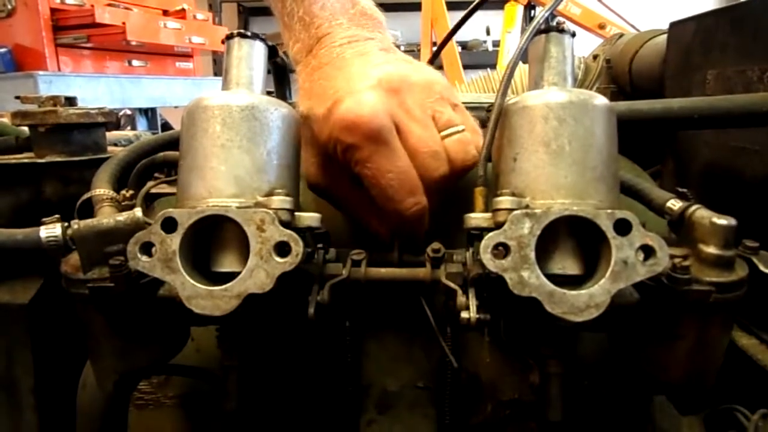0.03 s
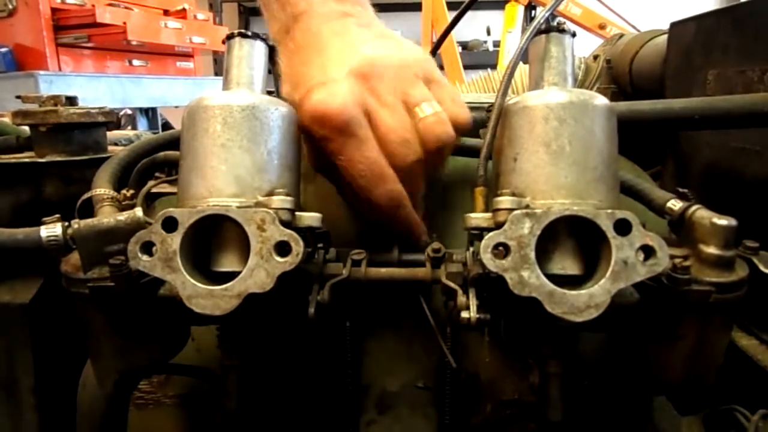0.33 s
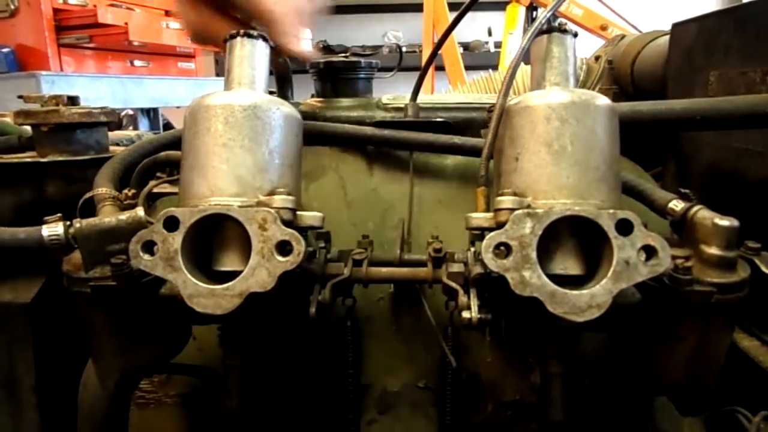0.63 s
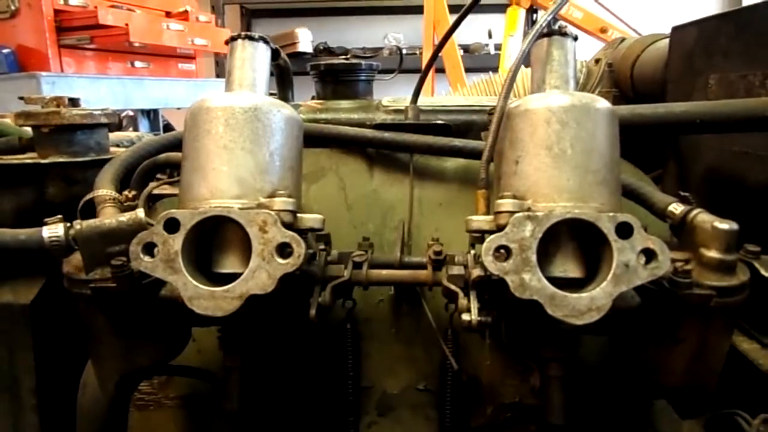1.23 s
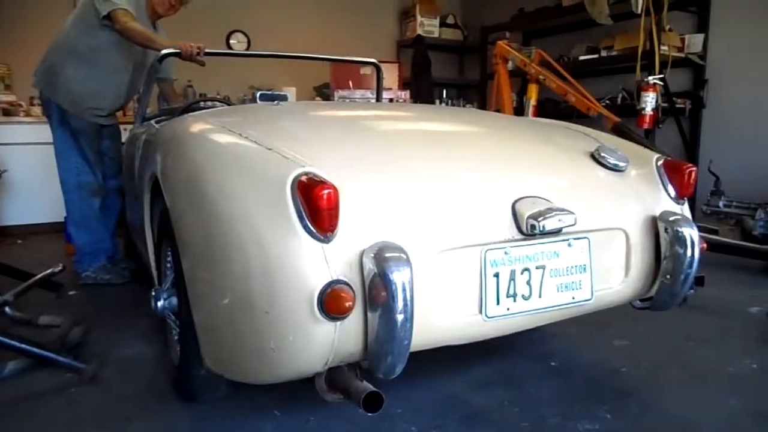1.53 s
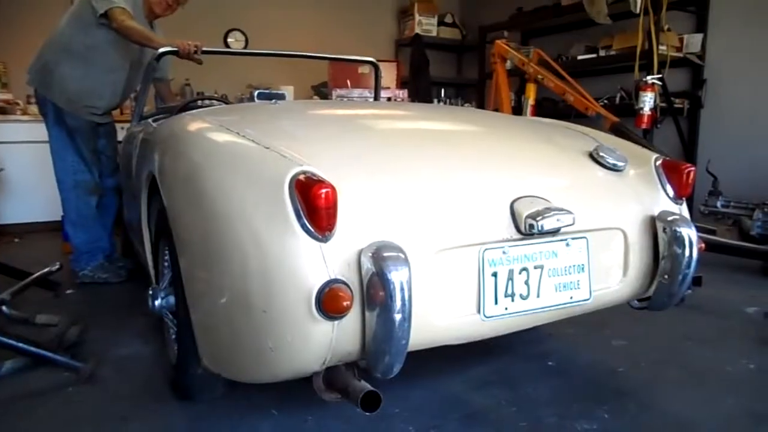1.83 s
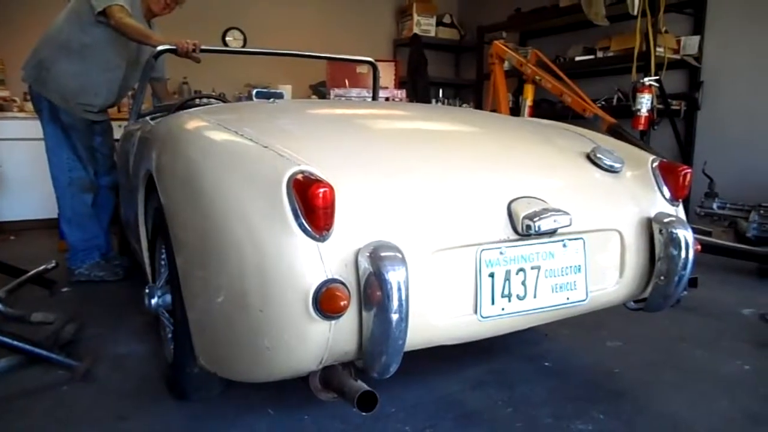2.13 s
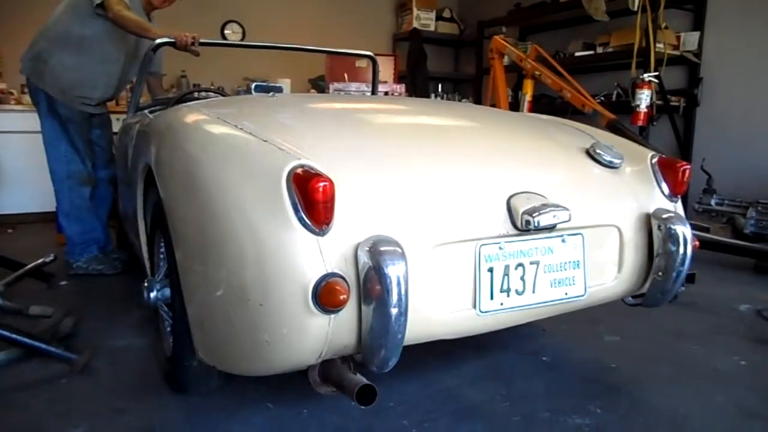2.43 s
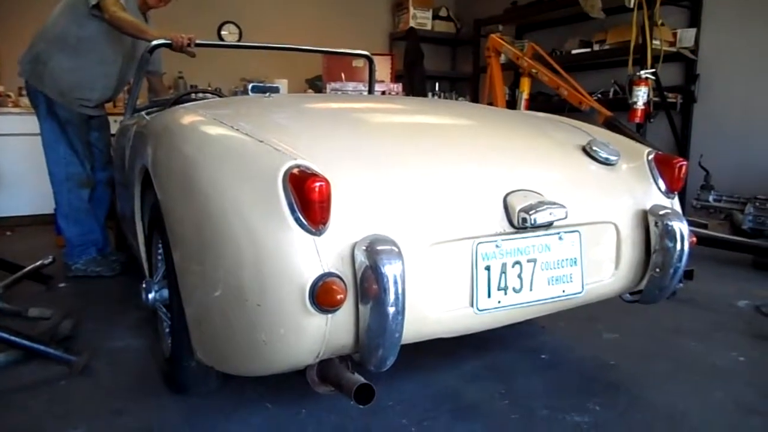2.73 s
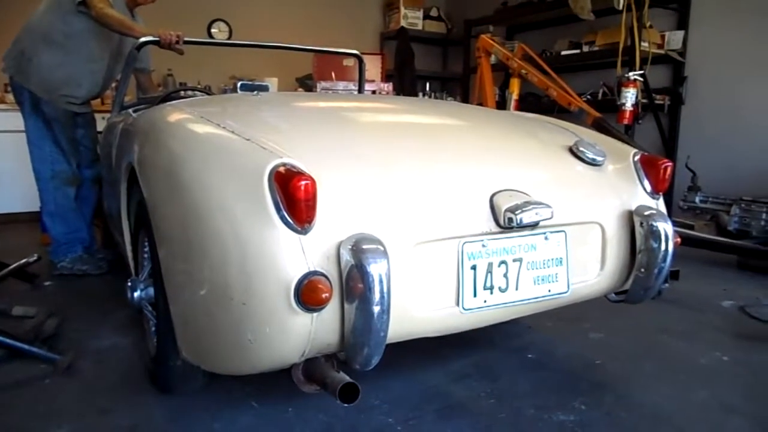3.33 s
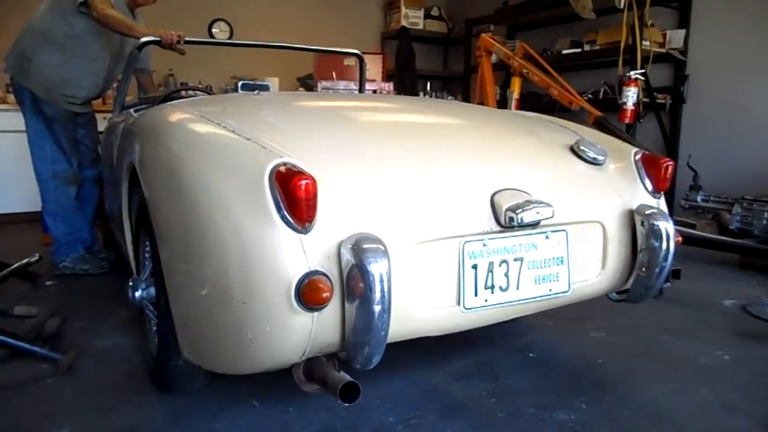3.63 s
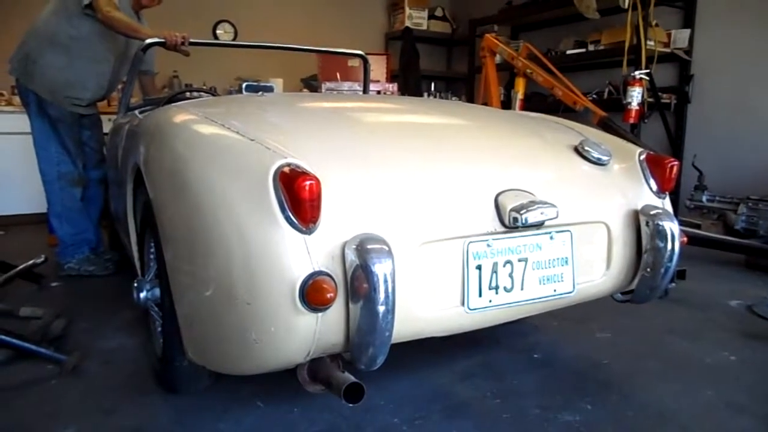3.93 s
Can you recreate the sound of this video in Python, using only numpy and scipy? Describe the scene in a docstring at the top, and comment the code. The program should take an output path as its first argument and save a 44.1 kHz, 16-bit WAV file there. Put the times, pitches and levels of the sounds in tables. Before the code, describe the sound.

An old four-cylinder car engine slows to a lumpy idle, its valves clattering close by. After a brief silence, heard from behind the tailpipe, it idles unevenly, spits, revs once with a rasp and runs down in a garage.

```python
"""In a garage, an old four-cylinder sports car is heard from two spots, with a short silence between.
Over the open carburettors the engine falls from a blip of throttle to a lumpy idle, valves clattering.
Behind the tailpipe it idles with the odd misfire, is revved once with a rasp and spits, and runs down.
Each firing pushes a pulse of gas down the pipe: the pulses boom and thump, and make the pipe ring."""
import sys
import numpy as np
from scipy import signal
from scipy.fft import rfft, irfft
from scipy.io import wavfile
from scipy.ndimage import uniform_filter1d

SR = 44100
rng = np.random.default_rng(int(sys.argv[2]) if len(sys.argv) > 2 else 0)


def store_wav(level_fs):
    """Save 16-bit WAV to argv[1]."""
    pcm = np.round(np.clip(np.atleast_2d(level_fs), -1, 1) * 32767)
    wavfile.write(sys.argv[1], SR, pcm.T.astype(np.int16))


N = 176400
T = np.arange(N) / SR


def from_db(db):
    """Turn decibels into a gain."""
    return 10 ** (np.asarray(db) / 20)


def curve(rows):
    """Join rows of (seconds, value) with straight lines."""
    return np.interp(T, *np.transpose(rows))


def even(x):
    """Hold the average level at 1, leaving single pulses alone."""
    power = uniform_filter1d(uniform_filter1d(x * x, size=4400), size=3000)
    return x / np.sqrt(np.maximum(power, 0) + 1e-18)


def colour(x, points):
    """Make some pitches louder and others softer, fading out above the last point."""
    size = 2 ** 18
    grid_hz = np.maximum(np.arange(size // 2 + 1) * SR / size, 1)
    hz, db = np.transpose(points)
    fade_db = -15 * np.log2(np.maximum(grid_hz / hz[-1], 1))
    gain = from_db(np.interp(np.log(grid_hz), np.log(hz), db) + fade_db)
    # Make the filter ring only after a pulse, never before it.
    cepstrum = irfft(np.log(gain))
    cepstrum[1:size // 2] *= 2
    cepstrum[size // 2 + 1:] = 0
    return irfft(rfft(x, size) * np.exp(rfft(cepstrum)))[:N]


def garage(x, echo_db, fade_s=0.46):
    """The walls add a short, blurred echo."""
    echo = rng.standard_normal(SR // 2) * from_db(-60 * T[:SR // 2] / fade_s)
    return x + from_db(echo_db) * signal.fftconvolve(x, echo / np.linalg.norm(echo))[:N]


def count_firings(speed, firing_s):
    """A rising count: a cylinder fires at each whole number, one of them at firing_s."""
    count = np.cumsum(curve(speed)) / SR
    count -= np.interp(firing_s, T, count)
    return count - np.floor(count[0])


def with_speed(count, mean_db, db_per_octave):
    """A gain that grows as the engine runs faster."""
    octaves = np.log2(np.gradient(count))
    return from_db(mean_db + db_per_octave * (octaves - octaves.mean()))


# The four cylinders in firing order. Each number: relative strength in dB.
CYLINDER_DB = [1, -0.26, 1, -0.66]
def strengths(count, uneven_db):
    """How strong the nearest firing is: its cylinder's strength plus some chance."""
    nearest = np.round(count).astype(int)
    chance_db = uneven_db * rng.standard_normal(N)[nearest]
    return from_db(np.array(CYLINDER_DB)[nearest % 4] + chance_db)


def pulses(count, uneven_db):
    """One click for each firing."""
    return np.diff(np.floor(count), prepend=0) * strengths(count, uneven_db)


def puffs(count, decay_s, steady, uneven_db):
    """Noise that flares at each whole count and dies down to a steady rush."""
    age_s = count % 1 / np.gradient(count) / SR
    noise = rng.standard_normal(N)
    return noise * (steady + np.exp(-age_s / decay_s) * strengths(count - .5, uneven_db))


def bursts(events, decay_s, tone):
    """Short cracks of noise that start at once and die away."""
    level = sum(from_db(db) * (T >= s) * np.exp(-np.abs(T - s) / decay_s) for s, db in events)
    return level * even(colour(rng.standard_normal(N), tone))


# Tone of the hiss over the engine. Each row: pitch in Hz, relative level in dB.
BAY_HISS_TONE = [(3000, -12.5), (5200, 5), (7300, 1.5), (9700, 3.5), (10600, 7.5), (15000, -2), (15700, 7),
                 (16300, -25.5)]
def bay_hiss(count):
    """A high hiss that flutters twice per firing."""
    noise = puffs(2 * count, decay_s=.0035, steady=1, uneven_db=5.5)
    return from_db(-48) * even(colour(noise, BAY_HISS_TONE))


# Gas hissing out of the pipe. Each row: time in seconds, level in dB.
TAIL_HISS = [(1.7, -60.5), (2.1, -59), (2.27, -52), (2.47, -52.5), (2.6, -48), (2.71, -49), (2.78, -55),
             (3.5, -58.5), (3.78, -65), (4, -59)]
# Its tone. Each row: pitch in Hz, relative level in dB.
TAIL_HISS_TONE = [(3000, -15), (5200, 0), (11000, -1.5), (15600, -9)]
def tail_hiss(count):
    """Gas hisses at the pipe's mouth, flaring with each firing."""
    gas = puffs(count, decay_s=.0015, steady=1.1, uneven_db=3)
    return from_db(curve(TAIL_HISS)) * even(colour(gas, TAIL_HISS_TONE))


# Tone of the valve clatter. Each row: pitch in Hz, relative level in dB.
CLATTER_TONE = [(600, -2), (1400, 0), (1750, -2), (3800, -4), (4300, -11), (6000, -18), (10000, -34)]
# Ringing metal parts. Each row: pitch in Hz, relative level in dB.
METAL_RINGS = [(2105, 2), (2294, -3.5), (2493, 2.5), (3205, 3.5), (3409, 2)]
def valve_clatter(count, decay_s, steady, uneven_db, ring_width_hz=14):
    """The valves rattle twice per firing and set the engine's metal ringing."""
    rattle = colour(puffs(2 * count, decay_s, steady, uneven_db), CLATTER_TONE)
    r = np.exp(-np.pi * ring_width_hz / SR)  # share of a ring left after one sample
    feed = (1 - r * r) / 2
    rings = np.zeros(N)
    for hz, db in METAL_RINGS:
        feedback = [1, -2 * r * np.cos(2 * np.pi * hz / SR), r * r]
        rings += from_db(db - .5) * signal.lfilter([feed, 0, -feed], feedback, rattle)
    return even(rattle + rings)


# Loud valve ticks. Each row: start in seconds, relative level in dB.
TICKS = [(.827, -33.5), (.8615, -25), (.9543, -30), (1.0121, -24), (1.053, -29), (1.0939, -25.5),
         (1.1807, -25.5), (1.275, -24), (1.3, -23.5)]
def valve_ticks():
    """Single ticks of the valve gear stand out as the engine slows."""
    ticks = bursts(TICKS, decay_s=.005, tone=[(1800, -20), (3000, 0), (3800, 0), (4800, -20)])
    return garage(from_db(-7.5) * ticks, echo_db=-2)


# Spits of gas. Each row: start in seconds, relative level in dB.
SPITS = [(2.2556, -27.5), (2.2851, -32), (2.3135, -31), (2.3379, -35), (2.3614, -30.5), (2.3828, -34),
         (2.4028, -48), (2.4397, -33), (2.4716, -28.5)]
def spits():
    """The tailpipe spits sharply as the rev begins."""
    tone = [(2000, -2.5), (5500, -6), (7600, 2.5), (9500, -5), (16000, -15)]
    return garage(from_db(-7) * bursts(SPITS, decay_s=.0034, tone=tone), echo_db=-2)


# Crackle of the rev. Each row: time in seconds, level in dB.
CRACKLE = [(2.42, -70), (2.5, -48), (2.6, -46), (2.72, -49.5), (2.76, -80)]
# Its tone. Each row: pitch in Hz, relative level in dB.
CRACKLE_TONE = [(2000, -7), (14000, 1)]
def crackle(count):
    """At full throttle every firing leaves the pipe with a bright snap."""
    snaps = puffs(count, decay_s=.0009, steady=0, uneven_db=2)
    return from_db(curve(CRACKLE)) * even(colour(snaps, CRACKLE_TONE))


def rasp(count, tone, rough, decay_s, echo_db, uneven_db=8):
    """The sharp edge of each pulse and its puff of gas ring in the pipe."""
    edges = even(pulses(count, uneven_db))
    gas = even(puffs(count, decay_s, steady=.65, uneven_db=5.5))
    return even(garage(colour(edges + rough * gas, tone), echo_db))


# Tone of the rasp over the engine. Each row: pitch in Hz, relative level in dB.
BAY_RASP_TONE = [(100, -22), (250, -1.5), (380, -5.5), (560, -4.5), (750, -9.5), (1100, -13), (1500, -22.5),
                 (3000, -40)]
def bay_rasp(count):
    """A breathy rasp that softens as the engine slows."""
    level = with_speed(count, mean_db=-35.5, db_per_octave=5.5)
    return level * rasp(count, BAY_RASP_TONE, rough=4, decay_s=.0053, echo_db=-1)


# Rasp behind the car. Each row: time in seconds, level in dB.
TAIL_RASP = [(1.7, -41), (2.1, -39.5), (2.5, -31.5), (2.73, -31.5), (2.85, -28), (3.15, -31), (3.6, -35),
             (4, -37.5)]
# Its tone. Each row: pitch in Hz, relative level in dB.
TAIL_RASP_TONE = [(130, -5), (245, 9), (290, -3), (335, -3.5), (400, -11), (670, -8.5), (1300, -20),
                  (4000, -52)]
def tail_rasp(count):
    """The pipe rasps most as the throttle shuts."""
    return from_db(curve(TAIL_RASP)) * rasp(count, TAIL_RASP_TONE, rough=1.24, decay_s=.012, echo_db=8.5)


# Bark of the open throttle. Each row: time in seconds, level in dB.
BARK = [(2.25, -47), (2.47, -44.5), (2.56, -29.5), (2.7, -28.5), (2.77, -35), (2.9, -61)]
# Its tone. Each row: pitch in Hz, relative level in dB.
BARK_TONE = [(250, -50), (520, -1.5), (780, 7), (980, 1), (1220, -10), (1500, -8.5), (2100, -18),
             (5000, -25.5)]
def throttle_bark(count):
    """The open throttle adds a higher, harder rasp."""
    bark = rasp(count, BARK_TONE, rough=.9, decay_s=.0022, echo_db=-7, uneven_db=3)
    return from_db(curve(BARK)) * bark


def drone(count, levels, tone):
    """Nearly even pulses make the pipe sing with clear overtones."""
    ringing = colour(pulses(count, uneven_db=2.5), tone)
    return from_db(curve(levels)) * even(garage(ringing, echo_db=-9))


# Firings that fail. Each row: time in seconds, drop of the thumps in dB.
MISFIRES = [(1.983, 19), (2.155, 11), (3.21, 8), (3.329, 20)]
def burn(dip_s=.014):
    """How well the fuel burns, dipping at each misfire."""
    return from_db(-sum(db * np.exp(-((T - s) / dip_s) ** 2) for s, db in MISFIRES))


def thumps(count, levels, tone, uneven_db, rough, echo_db, idle_hz=29, stumble=.04):
    """Pressure pulses and swirling gas thump through the pipe; slow firings come unevenly."""
    stray = uniform_filter1d(rng.standard_normal(N)[np.round(count).astype(int)], size=200)
    slowness = np.clip(2 - np.gradient(count) * SR / idle_hz, 0, 1)
    count = np.maximum.accumulate(count + stray * stumble * slowness)
    # Take out the steady flow and the lowest note, which boom() plays.
    lowest = np.gradient(count) * (1 + 2 * np.cos(2 * np.pi * count))
    gas = even(pulses(count, uneven_db) - lowest) + rough * rng.standard_normal(N)
    return garage(even(colour(gas, tone)) * from_db(curve(levels)) * burn(), echo_db)


def boom(count, levels, lag_s, uneven_db):
    """The exhaust's deep, clean note: one wave for each firing."""
    wave = np.sqrt(2) * np.cos(2 * np.pi * (count - lag_s * SR * np.gradient(count)))
    strength = uniform_filter1d(strengths(count, uneven_db), size=600)
    return wave * from_db(curve(levels)) * strength * np.sqrt(burn())


# The engine slowing after the blip. Each row: time in seconds, firings per second.
BAY_SPEED = [(0, 98.4), (.25, 90.1), (.42, 76.7), (.6, 69.9), (.76, 60.5), (.87, 56.5), (1.1, 46),
             (1.31, 35.5)]
# Exhaust boom, thumps and drone over the engine. Each row: time in seconds, base level in dB.
BAY_BOOM = [(0, -18), (.31, -17.5), (0.399, -19.5), (.45, -15), (.58, -14.5), (.65, -25), (.74, -19),
            (.8, -32), (1.2, -26), (1.31, -34)]
BAY_THUMP = [(0, -23.5), (.32, -23.5), (.5, -26.5), (.58, -22), (.68, -27.5), (.8, -26), (0.869, -18),
             (1.222, -25), (1.29, -20)]
BAY_DRONE = [(0, -24.5), (.13, -22), (.21, -25.5), (.28, -48)]
# Tone of those thumps and that drone. Each row: pitch in Hz, relative level in dB.
BAY_THUMP_TONE = [(20, -17.5), (50, -4), (80, -4), (118, 1.5), (150, -17.5), (195, -4), (260, -24.5),
                  (400, -24), (1400, -64.5)]
BAY_DRONE_TONE = [(110, -30), (185, 0), (285, -14), (380, -8), (480, -26)]
def engine_bay():
    """Close over the engine: the exhaust throbs under valve clatter and hiss."""
    count = count_firings(BAY_SPEED, firing_s=.0036)
    exhaust = boom(count, BAY_BOOM, lag_s=.0032, uneven_db=1.5)
    exhaust += thumps(count, BAY_THUMP, BAY_THUMP_TONE, uneven_db=4, rough=.47, echo_db=-5.5)
    exhaust += bay_rasp(count)
    clatter = valve_clatter(count, decay_s=.023, steady=.99, uneven_db=3)
    clatter *= with_speed(count, mean_db=-39, db_per_octave=4.5)
    return exhaust + clatter + bay_hiss(count) + valve_ticks() + drone(count, BAY_DRONE, BAY_DRONE_TONE)


# The engine idling, revving and running down. Each row: time in seconds, firings per second.
TAIL_SPEED = [(1.7, 28.77), (2.19, 28.78), (2.28, 33.47), (2.42, 53.82), (2.6, 90.34), (2.72, 114.36),
              (2.78, 108.8), (3, 95.8), (3.24, 80.3), (3.48, 69.1), (3.72, 59.2), (4, 52)]
# Exhaust boom, thumps and drone behind the car. Each row: time in seconds, base level in dB.
TAIL_BOOM = [(1.7, -19.5), (2.3, -18), (2.39, -29), (2.47, -23), (2.56, -14), (2.64, -10.5), (2.72, -23),
             (2.9, -14.5), (3.04, -10.3), (3.18, -11.5), (3.23, -16), (3.48, -12.5), (3.65, -19),
             (3.73, -28), (4, -30)]
TAIL_THUMP = [(1.7, -18.8), (2.15, -17), (2.35, -11), (2.42, -16.5), (2.49, -10.5), (2.54, -22),
              (2.66, -26), (2.94, -41), (3.3, -26.5), (3.65, -25), (3.88, -29), (4, -20)]
TAIL_DRONE = [(2.45, -38), (2.58, -21), (2.72, -23.5), (2.95, -29.5), (3.17, -27), (3.4, -38)]
# Tone of those thumps and that drone. Each row: pitch in Hz, relative level in dB.
TAIL_THUMP_TONE = [(15, -22), (40, -11), (60, .5), (88, 3.5), (125, 0), (165, -6.5), (200, -15.5),
                   (250, -16), (320, -36), (2000, -88)]
TAIL_DRONE_TONE = [(120, -25), (175, 1), (245, 4), (295, -8), (335, -4), (375, -19), (420, -13), (480, -29)]
def tailpipe():
    """Behind the car: the exhaust thumps, barks and spits, with the valves farther off."""
    count = count_firings(TAIL_SPEED, firing_s=1.773)
    exhaust = boom(count + .15, TAIL_BOOM, lag_s=.0058, uneven_db=.6)
    exhaust += thumps(count, TAIL_THUMP, TAIL_THUMP_TONE, uneven_db=1.3, rough=.33, echo_db=-11)
    exhaust += tail_rasp(count) + throttle_bark(count)
    clatter = valve_clatter(count, decay_s=.0059, steady=1.4, uneven_db=0)
    clatter *= with_speed(count, mean_db=-47, db_per_octave=3)
    gas = tail_hiss(count) + spits() + crackle(count)
    return exhaust + clatter + gas + drone(count, TAIL_DRONE, TAIL_DRONE_TONE)


def scene(bay_end_s=1.307, tail_start_s=1.702):
    """First over the engine, then silence, then behind the car."""
    return (engine_bay() * (T < bay_end_s) + tailpipe() * (T >= tail_start_s))[None]


def record(dry, ceiling=.68, cutoff_hz=15850):
    """Round off the loudest peaks and remove the highest treble."""
    rounded = dry / (1 + (dry / ceiling) ** 6) ** (1 / 6)
    return signal.sosfilt(signal.ellip(12, .1, 80, cutoff_hz, fs=SR, output="sos"), rounded)


dry = scene()
out = record(dry)
store_wav(out)
```